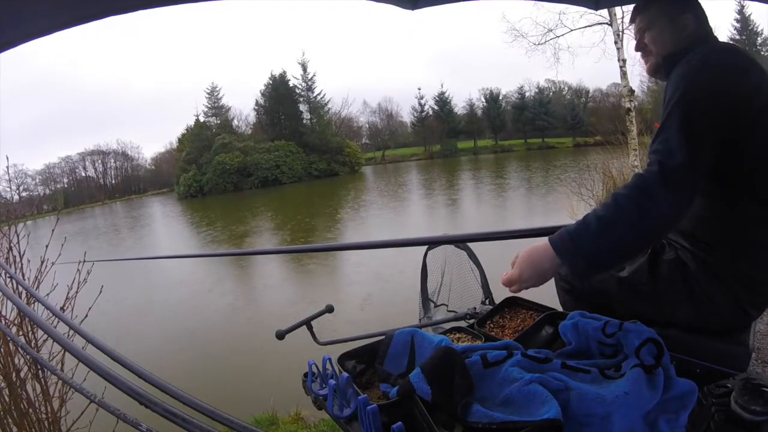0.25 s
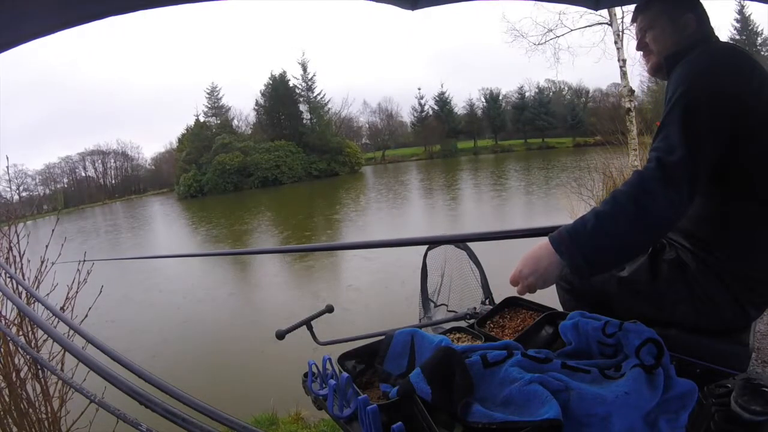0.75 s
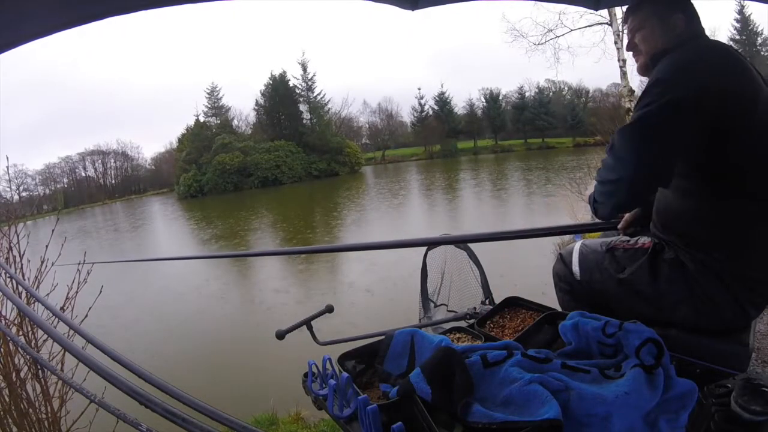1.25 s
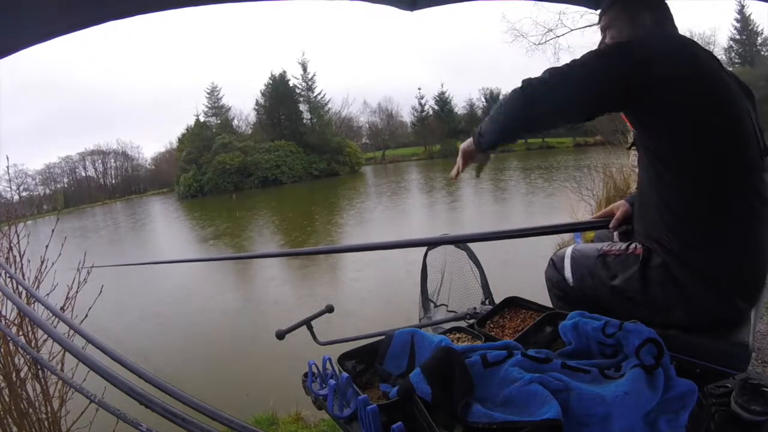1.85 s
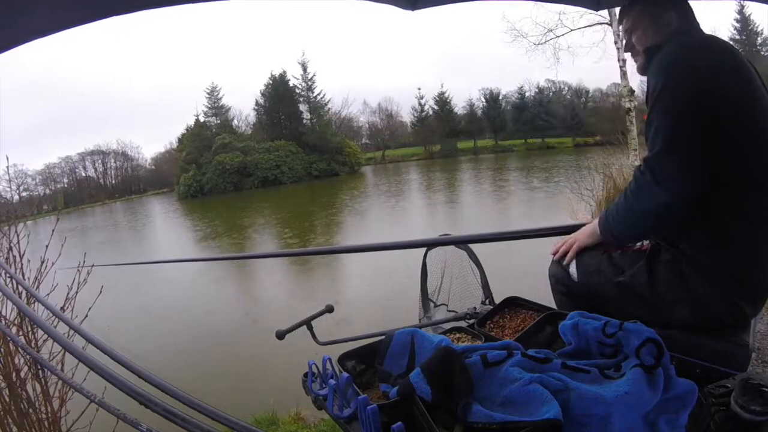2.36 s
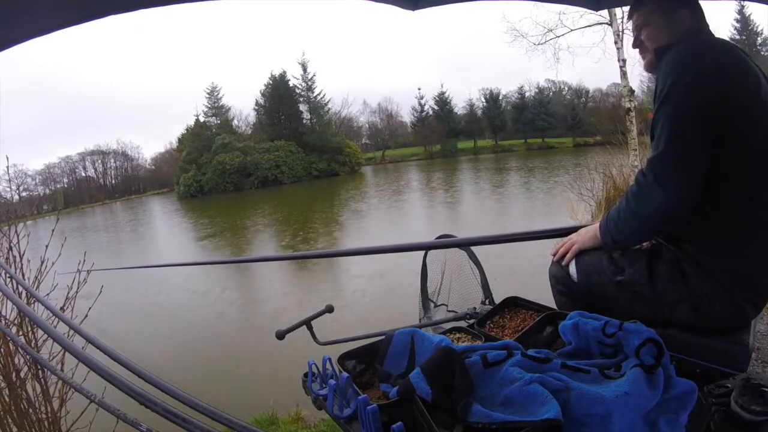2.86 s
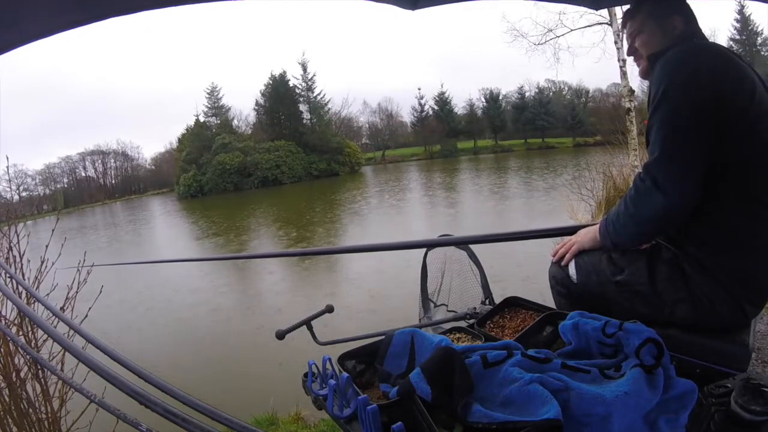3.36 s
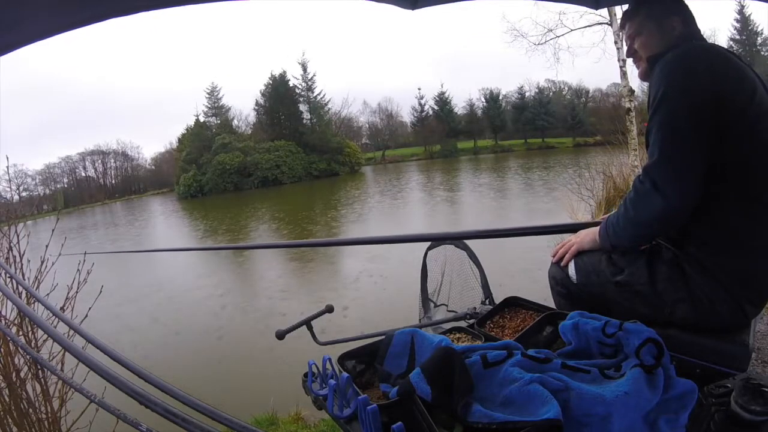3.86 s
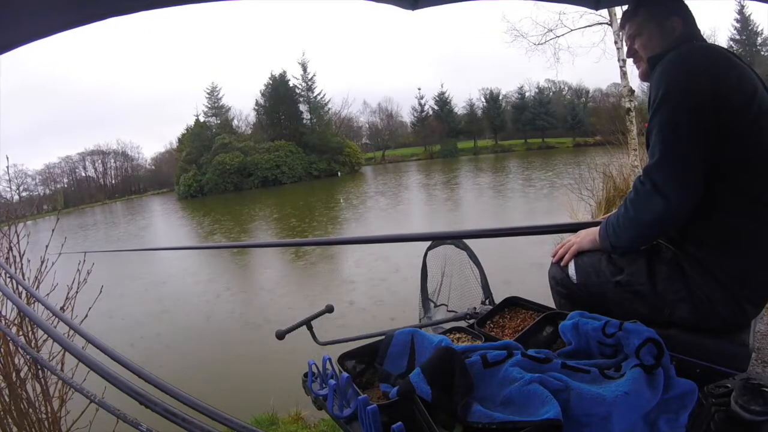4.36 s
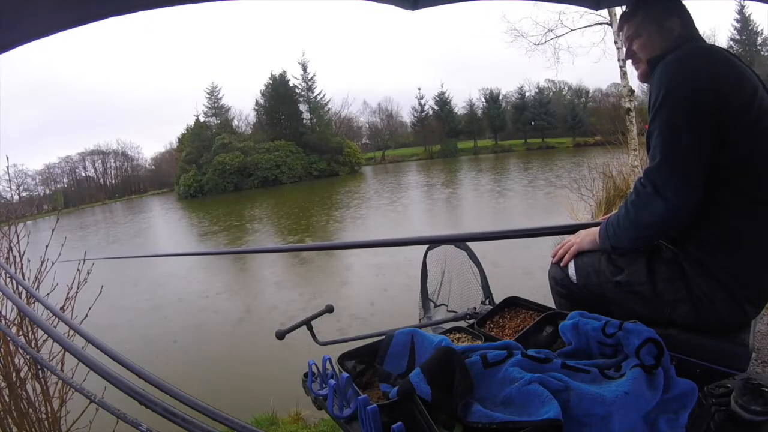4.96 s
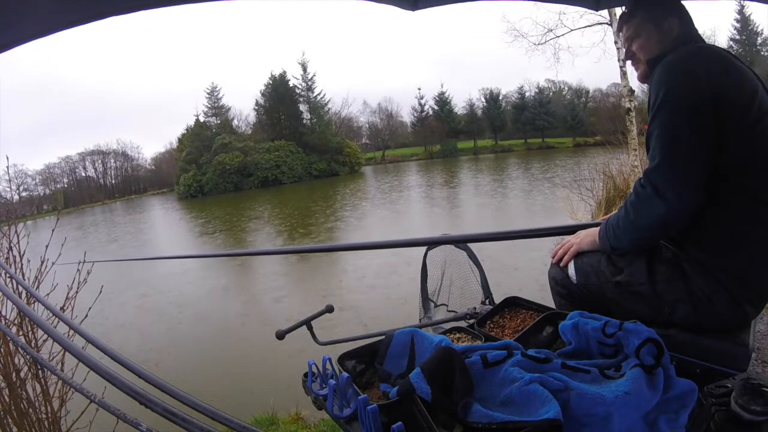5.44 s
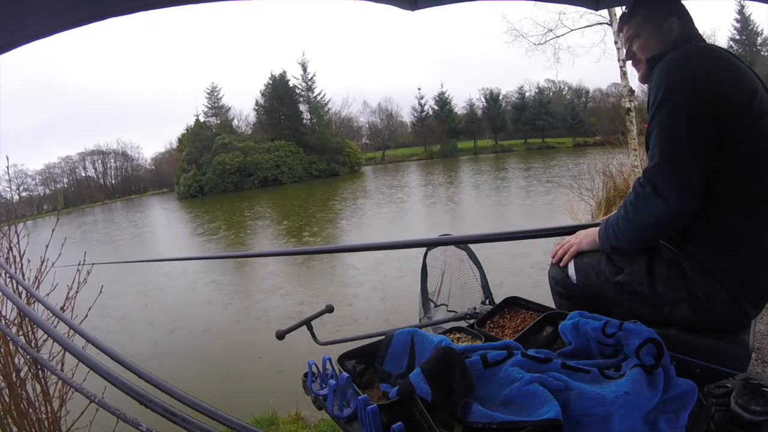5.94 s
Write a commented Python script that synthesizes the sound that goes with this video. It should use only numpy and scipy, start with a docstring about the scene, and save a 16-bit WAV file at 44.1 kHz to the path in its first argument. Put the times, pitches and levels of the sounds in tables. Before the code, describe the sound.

Steady rain patters on taut cloth with small close splashes, a distant bird singing quick slurs; the rain dips out, then a closer bird sings.

```python
"""A lakeside in the rain, heard from under an umbrella: drops tap the taut canopy overhead,
small splashes tick close by and the water hisses. A far songbird sings a run of slurs over a faint
engine drone. The sound of the rain is faded out and quickly faded in again as a near songbird starts
its repeated phrase: a warbled high note, an arched note and a small low one. Drops and splashes are
shaped bursts of noise, heavy drops add a decaying tone, and the birds are nearly pure gliding tones."""
import sys
import numpy as np
from scipy import signal
from scipy.fft import rfft, irfft, next_fast_len
from scipy.io import wavfile
from scipy.ndimage import uniform_filter1d

SR = 44100
rng = np.random.default_rng(int(sys.argv[2]) if len(sys.argv) > 2 else 0)


def log_audio(samples):
    """Write samples as a 16-bit WAV file to the path given in sys.argv[1]."""
    # one column per channel
    frames = np.atleast_2d(samples).T
    # limit to full scale, then quantise
    limited = np.clip(frames, -1, 1)
    pcm = np.round(limited * 32767).astype(np.int16)
    wavfile.write(sys.argv[1], SR, pcm)


N = 273420
TIME = np.arange(N) / SR


def undb(db):
    """Decibels to gain."""
    return 10 ** (np.asarray(db) / 20)


def level(x, db):
    """Set the rms level."""
    return x * undb(db) / np.sqrt(np.mean(x ** 2))


def pan(left_db):
    """Gains of the two channels; the left is louder than the right by left_db."""
    return undb(np.array([[left_db], [-left_db]]) / 2)


def curves(rows, at):
    """Join the rows of a table by straight lines."""
    x, *columns = np.transpose(rows)
    return [np.interp(at, x, c) for c in columns]


def add(out, s, sound):
    """Mix a sound in at time s."""
    i = int(np.clip(s * SR, 0, N - 1))
    out[..., i:i + sound.shape[-1]] += sound[..., :N - i]


def noise(size, likeness):
    """Two channels of noise with a given correlation, from a shared and an opposed part."""
    mid, side = rng.standard_normal((2, size))
    c = np.clip(likeness, -1, 1)
    return np.sqrt((1 + c) / 2) * mid + np.sqrt((1 - c) / 2) * np.array([side, -side])


def colour(x, points):
    """Causal filter with the given spectrum, its phase found from the cepstrum."""
    size = 2 * next_fast_len(x.shape[-1])
    hz, db = np.transpose(points)
    bins_hz = np.arange(size // 2 + 1) * SR / size
    gain = undb(np.interp(np.log(bins_hz + 1), np.log(hz), db))
    cepstrum = irfft(np.log(gain))[:size // 2]
    response = np.exp(2 * rfft(cepstrum, size) - cepstrum[0])
    return irfft(rfft(x, size) * response)[..., :x.shape[-1]]


def walk(rate):
    """Slow smooth chance with a spread near 1, drawn anew rate times a second."""
    k = int(SR / rate)
    steps = np.repeat(rng.standard_normal(N // k + 1), k)
    return 1.9 * uniform_filter1d(uniform_filter1d(steps, k), k)[:N]


def blow(x):
    """Scale a hit so that its first 4 milliseconds have an rms of 1."""
    return x / np.sqrt(np.mean(x[:, :SR // 250] ** 2))


# spectrum of the woods: freq_hz, gain_db (relative)
WOODS_SPECTRUM = [(150, -34), (1400, -22), (2300, -17), (2900, -0.5), (3800, 1), (4800, -11), (7000, -20),
                  (12000, -32.5)]


def woods():
    """The soft, blurred sound of the woods: coloured noise that murmurs in level."""
    murmur = undb(1.5 * walk(12))
    return level(colour(noise(N, 0.1), WOODS_SPECTRUM), -72.5) * murmur


# distant engine, before its trim and waver: time_s, level_db
ENGINE_LEVEL = [(0.0, -101), (0.6, -83.5), (2.26, -92.5), (2.48, -81.5), (3.37, -85.5), (4.86, -127),
                (5.02, -101), (5.53, -84), (5.6, -95), (6.15, -84)]
ENGINE_HZ = 91


def engine():
    """An engine drones far off: one low sine whose pitch and level waver slowly."""
    db = curves(ENGINE_LEVEL, TIME)[0] + 0.97 * walk(4.5)
    hz = ENGINE_HZ + 0.89 * walk(8.9)
    drone = np.sqrt(2) * undb(db) * np.sin(2 * np.pi * np.cumsum(hz) / SR)
    return undb(-1.0) * drone * pan(3.3)


def distance():
    """The far background: engine and woods."""
    return engine() + woods()


# spectrum of the low air: freq_hz, gain_db (relative)
AIR_SPECTRUM = [(15, -22), (35, 2), (58, 4.5), (80, 4), (130, -12), (300, -24.5)]


def air():
    """A faint low rumble of noise that breathes in level."""
    return level(colour(noise(N, 0.46), AIR_SPECTRUM), -86.0) * undb(1.0 * walk(2.56)) * pan(2.4)


# spectrum of rain on the lake: freq_hz, gain_db (relative)
LAKE_SPECTRUM = [(200, -12.5), (700, 6), (2000, 3), (4000, 1), (5500, -1), (7500, -4), (10000, -1),
                 (12200, -1), (14000, -3.5), (16000, -6.5)]


def lake():
    """Countless drops on the open water blend into a wavering hiss."""
    return level(colour(noise(N, -0.02), LAKE_SPECTRUM), -54.7) * undb(0.55 * walk(5.87)) * pan(0.9)


def shower(spots, per_s, spread_db):
    """Drops of uneven size fall at random on spots that each have their own sound."""
    out = np.zeros((2, N))
    drops = rng.random((20000, 3))
    for when, which, chance in drops[:int(per_s * N / SR)]:
        size = min(-np.log(1 - chance), 4)  # mostly small, a few big
        spot = spots[int(which * len(spots))]
        add(out, when * N / SR, undb(spread_db * size) * spot)
    return out


def droplet(hz):
    """A fine drop ticks on grass or water, with a pitch of its own."""
    snap_s, sharpness = .0009, 4
    t = np.arange(SR // 100) / SR
    burst = noise(len(t), -0.13) * np.exp(-t / snap_s)
    return blow(signal.lfilter(*signal.iirpeak(hz, sharpness, fs=SR), burst))


def drizzle():
    """A dense fall of fine ticks, wavering in level."""
    blades = [droplet(hz) for hz in np.linspace(3000, 15500, 120)]
    ticks = level(shower(blades, per_s=900, spread_db=3.0), -62.5)
    return ticks * undb(0.75 * walk(5.5)) * pan(1.0)


# spectrum of a splash: freq_hz, gain_db (relative)
SPLASH_SPECTRUM = [(500, -13), (2500, -11.5), (5500, -5), (8000, -8), (12000, -4.5), (16000, -6)]


def splash(bright_hz, bright_db=4):
    """A drop bursts on something wet and throws a little spray."""
    snap_s, spray_s, spray_db, rise_s = .002, .028, -7, .0006
    t = np.arange(SR // 9) / SR
    fall = np.exp(-t / snap_s) + undb(spray_db) * np.exp(-t / spray_s)
    x = noise(len(t), -0.068) * (1 - np.exp(-t / rise_s)) * fall
    x = x + undb(bright_db) * signal.lfilter(*signal.iirpeak(bright_hz, 3, fs=SR), x)
    return blow(colour(x, SPLASH_SPECTRUM)) * pan(0.91)


def spray():
    """Many small splashes near the umbrella."""
    spots = [splash(hz) for hz in np.linspace(4000, 13000, 40)]
    return level(shower(spots, per_s=70, spread_db=1.0), -58)


# sharp splashes close by: start_s, level_db (first 4 ms), brightest_hz
CLOSE_SPLASHES = [(.412, -52, 5200), (0.6685, -45, 10500), (0.889, -50, 9000), (1.0347, -50, 11000),
                  (1.112, -44, 5000), (1.1664, -50, 12000), (1.435, -44.5, 5460), (1.966, -53, 12700),
                  (2.35, -52, 9000), (2.356, -51, 5300), (2.452, -47, 9500), (2.6203, -42, 12400),
                  (3.315, -54, 12100), (5.1914, -51, 7500), (5.2902, -48, 12100), (5.49, -50, 9000),
                  (5.941, -50, 7500), (5.97, -47.5, 10900)]


def close_splashes():
    """Single splashes that stand out, each starting just after its table time."""
    out = np.zeros((2, N))
    for s, db, hz in CLOSE_SPLASHES:
        add(out, s + 0.0013, undb(db) * splash(hz))
    return out


# spectrum of the umbrella canopy: freq_hz, gain_db (relative)
CANOPY_SPECTRUM = [(70, -24), (150, -17.5), (260, -6.5), (360, -3), (490, -3), (700, -5.5), (1100, -2.5),
                   (1750, -1), (2400, -2), (3200, -1), (5000, -7), (9000, -17), (16000, -35.5)]


def tap(ring_hz, ring_s=0.03, ring_db=-9, return_s=.0046, return_db=-2, mode_db=7, likeness=0.67):
    """A drop snaps the cloth; the wave comes back from the ribs and the panel rings briefly."""
    snap_s = .0013
    t = np.arange(SR // 14) / SR
    back = (t > return_s) * np.exp(-np.abs(t - return_s) / snap_s)
    fall = np.exp(-t / snap_s) + undb(return_db) * back + undb(ring_db) * np.exp(-t / ring_s)
    x = noise(len(t), likeness) * fall
    x = x + undb(mode_db) * signal.lfilter(*signal.iirpeak(ring_hz, 4, fs=SR), x)
    return blow(colour(x, CANOPY_SPECTRUM)) * pan(-5.5)


def patter():
    """Ordinary drops patter on canopy panels of many pitches."""
    panels = [tap(hz) for hz in np.geomspace(420, 2300, 48)]
    return level(shower(panels, per_s=270, spread_db=2.0), -55.5)


def knock(hz, ring_s):
    """The cloth struck hard: a short decaying tone, the same shape in both channels."""
    t = np.arange(SR // 14) / SR
    tone = np.sin(2 * np.pi * hz * t) * np.exp(-t / ring_s)
    return blow(colour(np.array([[1], [1]]) * tone, CANOPY_SPECTRUM)) * pan(-3.5)


def heavy_drop(ring_hz, ring_s, knock_db=-2, cloth_db=-3, return_s=0.00434, return_db=-2,
               return_pitch=0.72, bounce_db=-12, scatter_s=0.022, count=2):
    """A big drop knocks the cloth, the wave returns lower from the ribs, and droplets land a moment later."""
    out = np.zeros((2, SR // 6))
    add(out, 0, undb(knock_db) * knock(ring_hz, ring_s) + undb(cloth_db) * tap(ring_hz))
    add(out, return_s, undb(knock_db + return_db) * knock(return_pitch * ring_hz, ring_s))
    for when, pitch in rng.random((count, 2)):
        add(out, scatter_s * (0.23 + when), undb(bounce_db) * tap(ring_hz * (.5 + pitch)))
    return out


# heavy drops on the canopy: start_s, level_db (of the whole hit, relative), ring_hz, ring_s
HEAVY_DROPS = [(.127, -48.5, 1740, .001), (.147, -50, 1890, 0.0019), (.417, -53, 1750, .0015),
               (.888, -47, 1940, .001), (.898, -50.5, 1250, 0.0015), (0.979, -49, 1810, 0.00065),
               (1.034, -41.5, 1620, 0.00083), (1.044, -50.5, 1200, .002), (1.054, -52, 1550, 0.0018),
               (1.184, -53, 1660, .002), (1.319, -50.5, 790, .001), (1.461, -50, 1640, 0.0017),
               (1.579, -50.5, 1600, 0.0012), (1.689, -50, 2050, 0.00089), (2.327, -57, 670, 0.003),
               (2.332, -52.5, 714, 0.0023), (2.341, -52.5, 950, .0015), (2.348, -52, 1100, .001),
               (2.357, -51, 1510, .001), (2.596, -50, 1670, 0.0013), (2.73, -54, 1500, .002),
               (2.778, -59, 730, .001), (2.84, -49.5, 1610, .004), (2.944, -60, 1530, .004),
               (3.259, -57, 1660, 0.0033), (3.676, -52, 1360, 0.002), (3.748, -56, 2010, .001),
               (3.884, -62.5, 1510, .0015), (5.097, -52.5, 1750, 0.0025), (5.174, -54, 1620, 0.0011),
               (5.421, -54.5, 665, 0.0025), (5.499, -52, 1280, .002), (5.565, -50, 2230, 0.0009),
               (5.631, -50, 1790, 0.0018), (5.754, -65, 2020, 0.00087), (5.919, -50, 1710, .001)]


def heavy_drops():
    """Single big drops overhead, each starting just after its table time."""
    out = np.zeros((2, N))
    for s, db, hz, ring_s in HEAVY_DROPS:
        add(out, s + 0.000945, undb(db) * heavy_drop(hz, ring_s))
    return out


# the fade-out runs from OUT_S to TURN_S, the fade-in lasts IN_LENGTH_S (seconds); FLOOR_DB is the lowest gain
OUT_S, TURN_S, IN_LENGTH_S, FLOOR_DB = 3.25, 4.85, .37, -48
OUT_POWER, IN_POWER = 1.79, 1.38


def rain_fade():
    """Gain on the sound of the rain: steady, a long fade-out, a quick fade-in."""
    fade_out = np.clip((TURN_S - TIME) / (TURN_S - OUT_S), 0, 1) ** OUT_POWER
    fade_in = np.clip((TIME - TURN_S) / IN_LENGTH_S, 0, 1) ** IN_POWER
    return np.maximum(fade_out + fade_in, undb(FLOOR_DB))


def rain():
    """The blended rain is faded out and in; heavy drops and close splashes keep their own levels on top."""
    blend = patter() + spray() + drizzle() + lake() + air()
    return blend * rain_fade() + heavy_drops() + close_splashes()


def glide(length_s, start_hz, turn_hz, end_hz, turn, bow):
    """Pitch: straight to a turning point, then to its end, settling (bow < 0) or ever faster (bow > 0)."""
    u = np.linspace(0, 1, int(length_s * SR))
    turn = np.clip(turn, .05, .95)
    after = np.maximum(u - turn, 0) / (1 - turn)
    bend = np.expm1(bow * after) / np.expm1(bow)
    hz = np.interp(u, [0, turn], [start_hz, turn_hz]) + (end_hz - turn_hz) * bend
    return uniform_filter1d(hz, size=SR // 150)  # the throat rounds the corner


def whistle(hz, attack, release, depth=0, shaken=1, warble_hz=190, waver=0.013, detune_db=28, lead=.12):
    """A nearly pure tone whose pointed vibrato dies away; attack, release and shaken are shares of the note."""
    t, u = np.arange(len(hz)) / SR, np.linspace(0, 1, len(hz))
    reach = depth * np.maximum(1 - (u / shaken) ** 4, 0)
    unsteady = level(uniform_filter1d(rng.standard_normal(SR), SR // 500), 0)[:len(t)]
    cycles = warble_hz * t - lead + .035 * unsteady
    vibrato = -reach * signal.sawtooth(2 * np.pi * cycles, .5)
    # the tone weakens whenever it swings off the resonance of the throat
    flutter_db = detune_db * (reach / 5 - np.abs(vibrato) + reach * unsteady / 5)
    envelope = np.minimum(u / attack, 1) * np.minimum((1 - u) / release, 1)
    phase = 2 * np.pi * np.cumsum(hz * (1 + vibrato + waver * unsteady)) / SR
    return np.sqrt(2) * envelope * undb(flutter_db) * np.sin(phase)


def series(start_s, gap_s, db, count, rise_db=0):
    """Start times and gains of evenly spaced notes that may grow from one to the next."""
    return zip(start_s + gap_s * np.arange(count), undb(db + rise_db * np.arange(count)))


# thin whistles far off, levels before the mix across the water:
# start_s, length_s, pitch_hz, level_db, sag_octaves, vibrato (share of the pitch)
WHISTLES = [(3.39, 0.31, 5470, -65.5, 0.03, 0), (3.76, 0.11, 5500, -73, 0.041, 0.0079),
            (4.075, 0.18, 5760, -73, .14, 0.052), (4.13, .2, 6620, -72.5, .02, 0.025),
            (4.438, .15, 7030, -86, 0.27, 0.023), (4.558, 0.34, 2747, -71.5, 0.031, 0.058)]
# a quick run of scolding ticks, the level that of the first before the same mix
TICKS_START_S, TICK_GAP_S, TICK_DB = 4.595, .0712, -63.5


def far_calls():
    """Thin drawn-out whistles that sag, and scolding ticks that plunge in pitch."""
    out = np.zeros(N)
    for s, length_s, hz, db, sag, depth in WHISTLES:
        line = hz * 2 ** (sag * np.linspace(.5, -.5, int(length_s * SR)))
        call = whistle(line, attack=0.17, release=0.41, depth=depth, shaken=2.3, warble_hz=80, waver=0.0063)
        add(out, s, undb(db) * call)
    tick = glide(0.026, 5000, 2950, 1300, turn=0.13, bow=1.4)
    for s, gain in series(TICKS_START_S, TICK_GAP_S, TICK_DB, count=4, rise_db=1.5):
        add(out, s, gain * whistle(tick, attack=.2, release=.65))
    return out


# all levels of the far song are those before the mix across the water
# falling chips that open the run, on a steady beat
BEAT_S, CHIPS_START_S, CHIP_DB = .116, .058, -54
# slurs of the run: start_s, level_db
SLURS = [(0.621, -48), (.739, -47.5), (.861, -48.5), (0.976, -48), (1.095, -48.5), (1.214, -48.3),
         (1.336, -48.3), (1.464, -48.8)]
# lone buzzy slurs: start_s, level_db
BUZZES = [(2.241, -50), (4.936, -59)]
# short arched peeps: start_s, top_hz, level_db
PEEPS = [(0.406, 5220, -53), (.498, 5200, -54), (.558, 5280, -53), (2.522, 5280, -56)]


def far_song():
    """A run of falling chips, then dipping slurs at nearly the same pace; peeps and lone buzzes besides."""
    out = np.zeros(N)
    chip = glide(0.042, 7000, 6000, 3800, turn=0.54, bow=-1.44)
    for s, gain in series(CHIPS_START_S, BEAT_S, CHIP_DB, count=3):
        add(out, s, gain * whistle(chip, attack=0.35, release=0.33, depth=0.1))
    slur = glide(.08, 6500, 3050, 4300, turn=.69, bow=-1.6)
    carry = np.minimum(slur / 3800, 1) ** 4.5  # the voice thins out at the bottom of the dip
    for s, db in SLURS:
        note = whistle(slur, attack=.3, release=.18, depth=.16, shaken=.44, waver=.013)
        add(out, s, undb(db) * carry * note)
    buzz = glide(.08, 4700, 3350, 3900, turn=.65, bow=-1.1)
    for s, db in BUZZES:
        add(out, s, undb(db) * whistle(buzz, attack=.12, release=.7, depth=.1, shaken=.6))
    for s, hz, db in PEEPS:
        peep = glide(.026, 0.93 * hz, hz, 0.48 * hz, turn=0.29, bow=2.8)
        add(out, s, undb(db) * whistle(peep, attack=0.12, release=0.15))
    return out


def sing(hz, db, fade_s=.005, waver=.009, flutter_db=1.0):
    """A pure tone that follows a pitch and a level; the throat keeps neither quite steady."""
    t = np.arange(len(hz)) / SR
    chance = uniform_filter1d(uniform_filter1d(rng.standard_normal((2, SR)), SR // 300), SR // 600)
    pitch, loudness = level(chance, 0)[:, :len(t)]
    fade = np.sin(np.pi / 2 * np.minimum(np.minimum(t, t[-1] - t) / fade_s, 1))
    gain = fade * undb(uniform_filter1d(db, size=SR // 800) + flutter_db * loudness)
    return np.sqrt(2) * gain * np.sin(2 * np.pi * np.cumsum(hz * (1 + waver * pitch)) / SR)


# rate of the warble, its length, and the length of the slide after it
WARBLE_HZ, WARBLE_S, FALL_S = 74, .041, .031


def high_note(length_s, crest_hz, trough_hz, shoulder_hz, landing_hz, end_hz):
    """A warble with pointed crests and round troughs narrows, slides from its shoulder, then flattens or curls up."""
    onset_db, onset_s, detune_db, throat_hz = -12, .021, 7, 5250
    catch_db, catch_s, shaken_db = -11, .0016, 3
    t = np.arange(int(length_s * SR)) / SR
    u = t / WARBLE_S
    top = np.interp(u, [0, 2 / 3, 1], [.94 * crest_hz, crest_hz, shoulder_hz])
    bottom = trough_hz * np.interp(u, [1 / 2, 5 / 6], [1, 1.15])
    warble = top - (top - bottom) * np.abs(np.sin(np.pi * WARBLE_HZ * t)) ** 1.2
    slide = np.interp(t - WARBLE_S, [0, FALL_S, length_s - WARBLE_S], [shoulder_hz, landing_hz, end_hz])
    slide = uniform_filter1d(slide, size=SR // 100)
    hz = uniform_filter1d(np.where(u < 1, warble, slide), size=SR // 1000)
    # the warble grows in and weakens whenever it swings off the resonance of the throat
    db = onset_db * np.maximum(1 - t / onset_s, 0)
    db = db - detune_db * (u < 1) * ((hz - throat_hz) / 1000) ** 2
    # the voice catches before the slide and softens over the last 12 ms
    db = db + catch_db * np.exp(-((t - WARBLE_S - catch_s) / catch_s) ** 2)
    db = db - 8 * np.clip(1 - (length_s - t) / .012, 0, 1)
    shaken = np.clip(2 - 1.5 * u, 0, 1)
    flutter_db = np.maximum(shaken_db * shaken, 1)
    return sing(hz, db, fade_s=.003, waver=.011 + .018 * shaken, flutter_db=flutter_db)


def arch_note(length_s, start_hz, top_hz, swell_db, turn=.745, sweep=1.45, drop=0.335, fade_db=12):
    """A whistle climbs ever faster and louder, rounds over and plunges away."""
    u = np.linspace(0, 1, int(length_s * SR))
    turn = np.clip(turn, .5, .9)
    rise = np.minimum(u / (turn - .05), 1)
    fall = np.maximum(u - turn, 0) / (1 - turn)
    hz = start_hz + (top_hz - start_hz) * rise ** sweep - drop * top_hz * fall ** 2
    db = -swell_db * (1 - rise) ** 1.8 - fade_db * fall ** 2
    return sing(uniform_filter1d(hz, size=SR // 200), db)


# levels of the near bird are those before each note's own swell and fade
# high notes that open the phrases:
# start_s, level_db, length_s, warble_crest_hz, warble_trough_hz, shoulder_hz, landing_hz, end_hz
HIGH_NOTES = [(4.723, -48, 0.09, 5920, 4320, 5550, 4500, 4400),
              (5.0743, -40.5, 0.089, 6390, 4100, 5240, 4360, 4190),
              (5.418, -39, 0.097, 6410, 3920, 5680, 4870, 5080),
              (5.7807, -40.5, 0.1, 6480, 4130, 5800, 4860, 4740),
              (6.16, -42, .092, 6170, 3980, 5740, 4830, 4900)]
# arched notes in the middle: start_s, level_db, length_s, start_hz, top_hz, swell_db
ARCHED_NOTES = [(4.873, -41, 0.078, 2923, 4000, 33), (5.221, -37.5, .071, 2850, 4050, 25),
                (5.576, -37.5, 0.073, 3094, 4080, 21), (5.935, -38, 0.079, 3370, 4210, 21)]
# small closing notes: start_s, level_db, length_s, start_hz, middle_hz, end_hz
LOW_NOTES = [(4.962, -55.5, .031, 2190, 2620, 2520), (5.311, -50, .036, 2376, 2790, 2700),
             (5.667, -45.5, 0.034, 2460, 2850, 3040), (6.026, -48, 0.048, 2410, 2990, 3150)]


def near_song():
    """Each phrase: a high note that warbles and settles, an arched note, a small low one."""
    out = np.zeros(N)
    for s, db, *shape in HIGH_NOTES:
        add(out, s, undb(db) * high_note(*shape))
    for s, db, *shape in ARCHED_NOTES:
        add(out, s, undb(db) * arch_note(*shape))
    for s, db, *shape in LOW_NOTES:
        line = glide(*shape, turn=.5, bow=.5)
        add(out, s, undb(db) * whistle(line, attack=.37, release=.25, waver=.008))
    return out


def trees(x, t60_s, wet_db, early_s, early_db, reach_s):
    """Near trunks and the bank scatter a sound once it reaches them; far trees return a long thin tail."""
    t = np.arange(SR) / SR
    onset = np.minimum(t / reach_s, 1) ** 2
    decay = np.exp(-np.log(1000) * t / t60_s) + undb(early_db) * np.exp(-t / early_s)
    tail = noise(SR, 0.076) * onset * decay
    tail = tail / np.sqrt(np.sum(tail ** 2) / 2)
    return undb(wet_db) * signal.fftconvolve(x[None], tail, axes=1)[:, :N]


def birds():
    """One bird near and a little to the left, others further left across the water, all among trees."""
    near, song, calls = near_song(), far_song(), far_calls()
    direct = np.array([near, np.roll(near, 1)]) * pan(1.4)  # the right side hears it a moment later
    close = direct + trees(near, t60_s=.7, wet_db=-8.5, early_s=.028, early_db=8, reach_s=.019)
    song = song * undb(2.2 * walk(160) - 3)  # the far song flickers in level
    distant = song + trees(song, t60_s=.7, wet_db=-1.5, early_s=.018, early_db=9, reach_s=.005)
    farthest = calls + trees(calls, t60_s=.9, wet_db=0, early_s=.02, early_db=6, reach_s=.006)
    return close + undb(-4.5) * (distant + farthest) * pan(6.5)


def scene():
    """The distance, the rain and the birds."""
    return distance() + rain() + birds()


TOP_HZ = 15750


def record(dry):
    """The recorder cuts the top steeply."""
    return signal.sosfilt(signal.ellip(12, .1, 70, TOP_HZ, fs=SR, output="sos"), dry)


dry = scene()
out = record(dry)
log_audio(out)
```